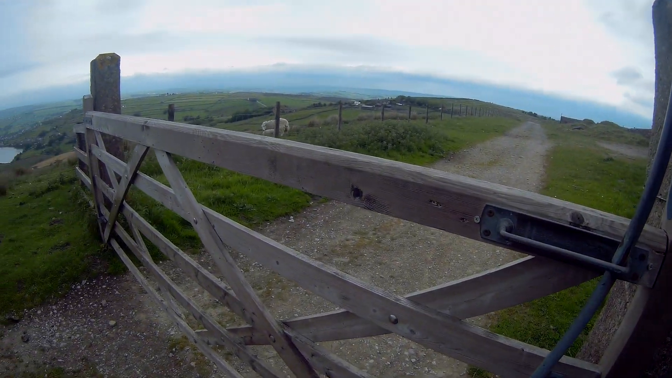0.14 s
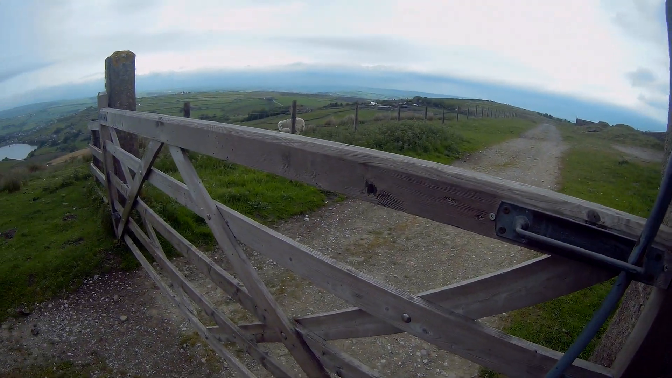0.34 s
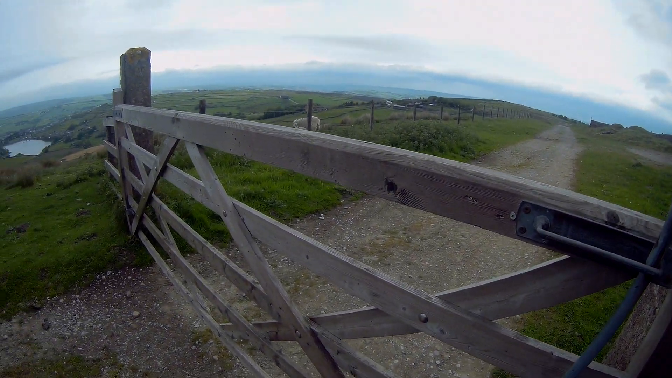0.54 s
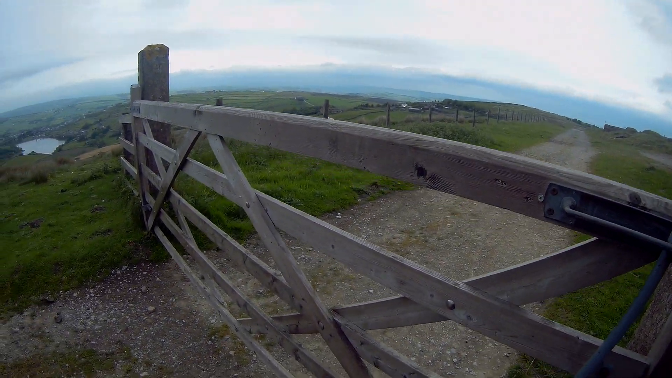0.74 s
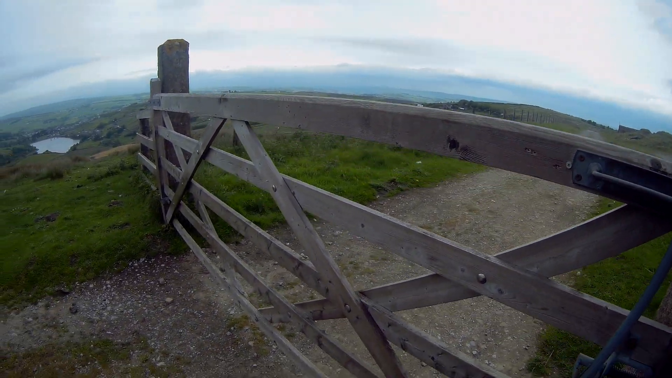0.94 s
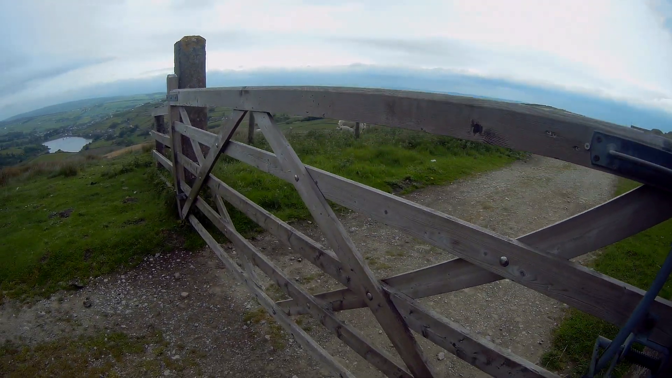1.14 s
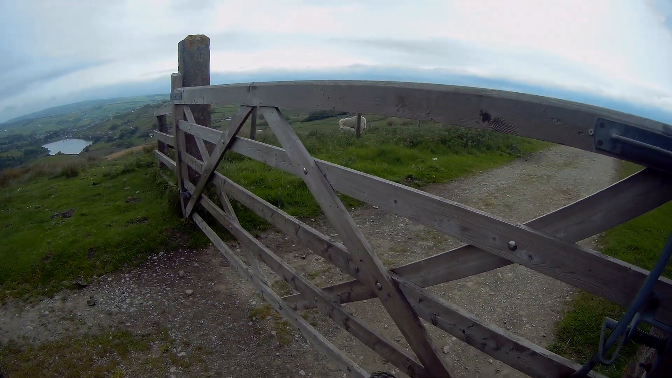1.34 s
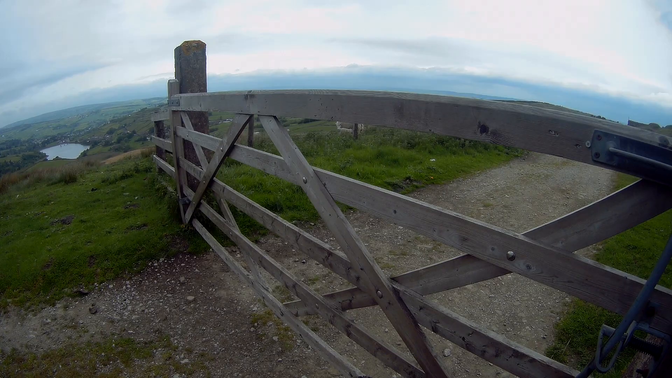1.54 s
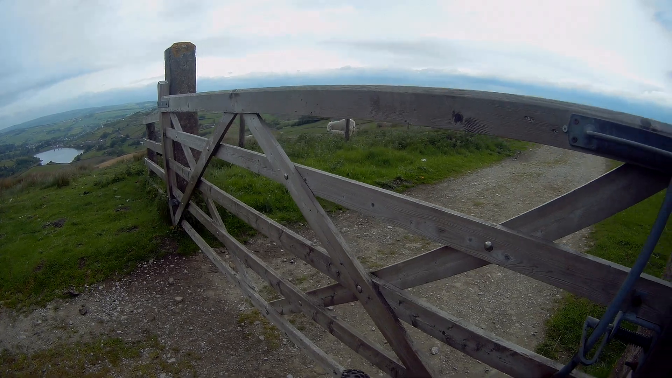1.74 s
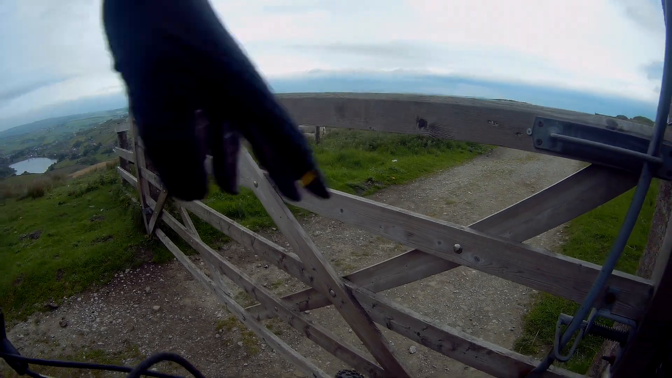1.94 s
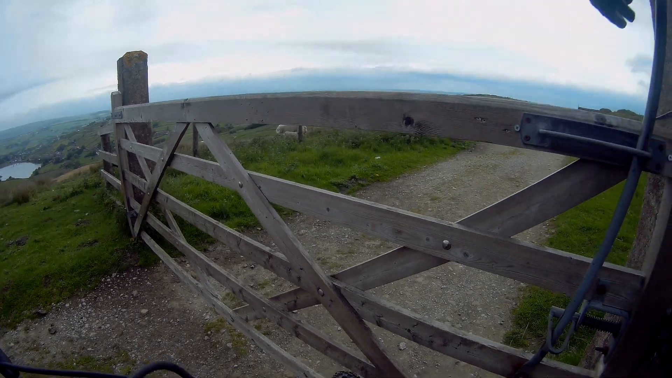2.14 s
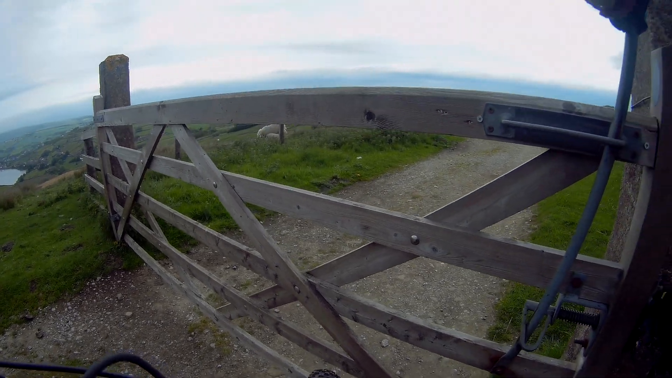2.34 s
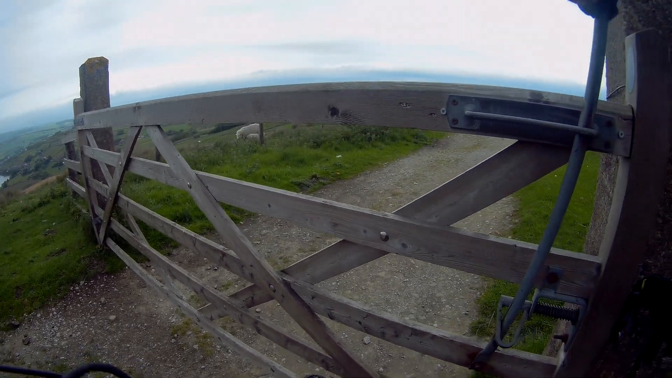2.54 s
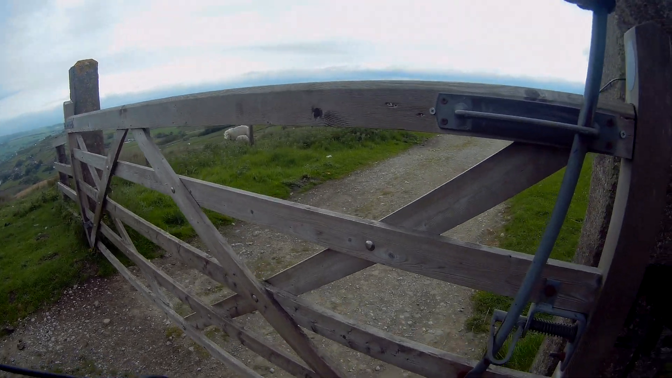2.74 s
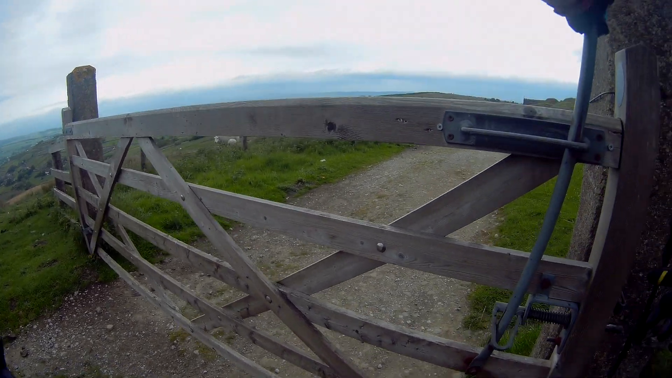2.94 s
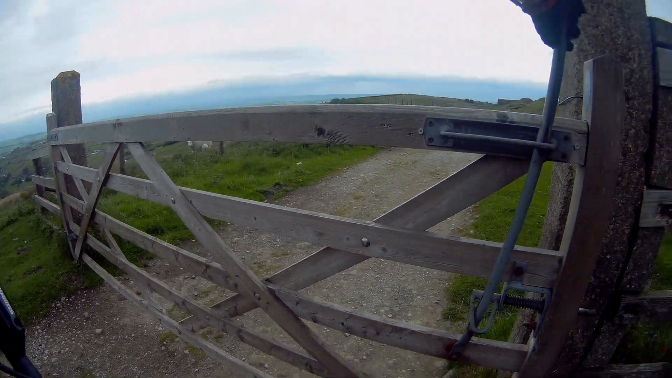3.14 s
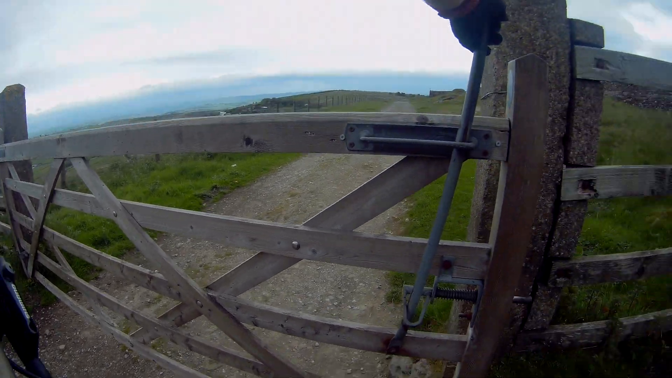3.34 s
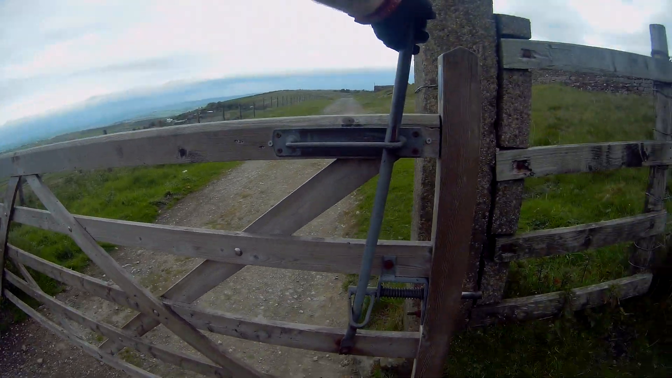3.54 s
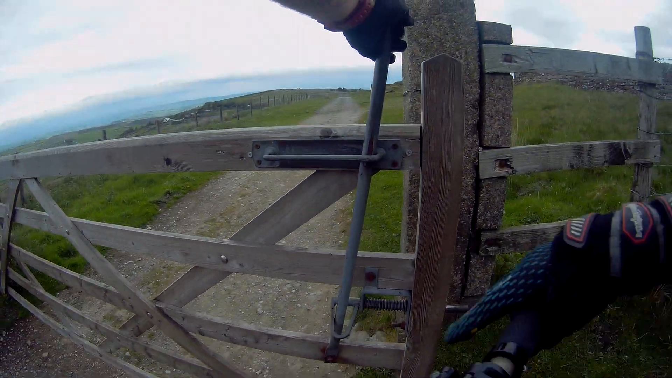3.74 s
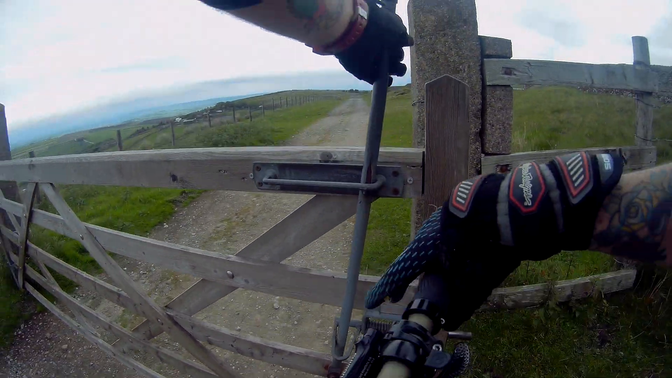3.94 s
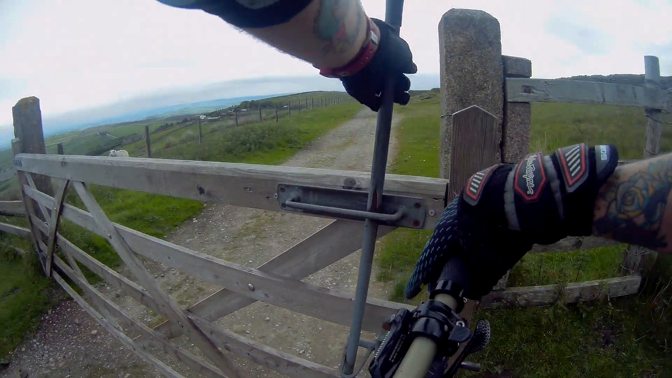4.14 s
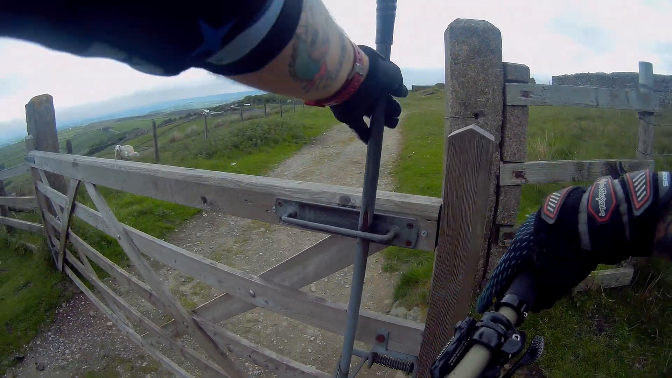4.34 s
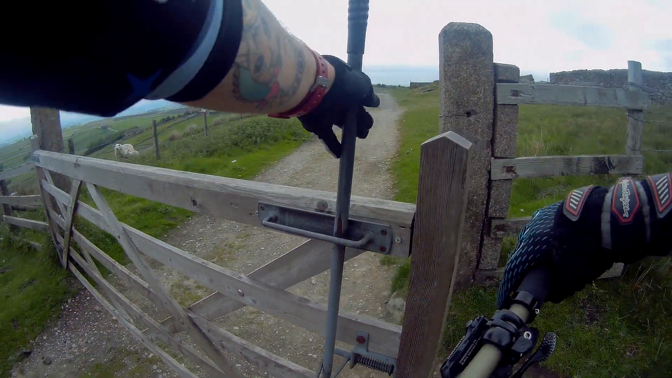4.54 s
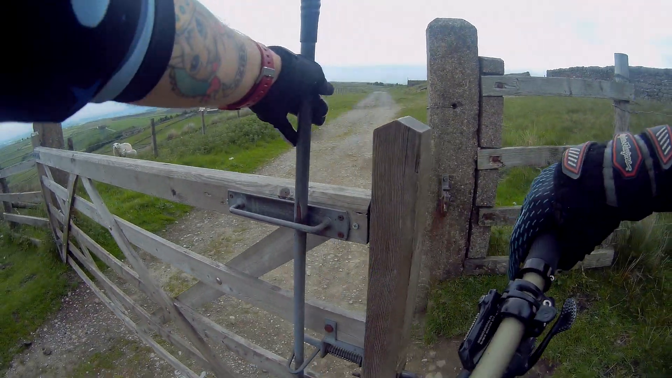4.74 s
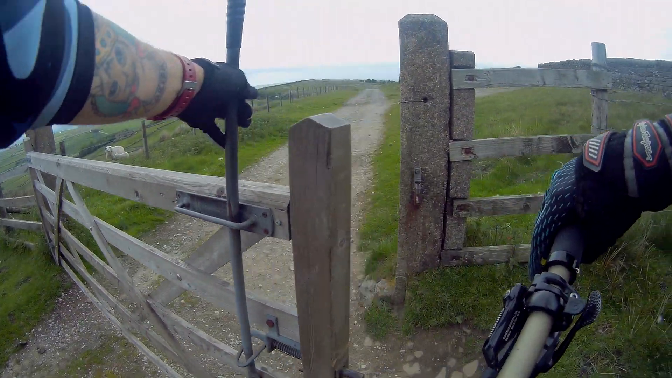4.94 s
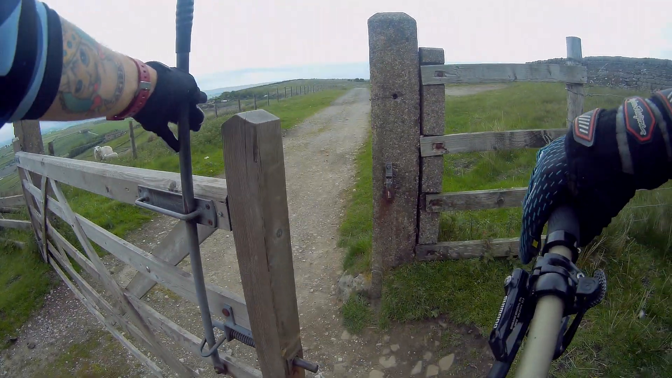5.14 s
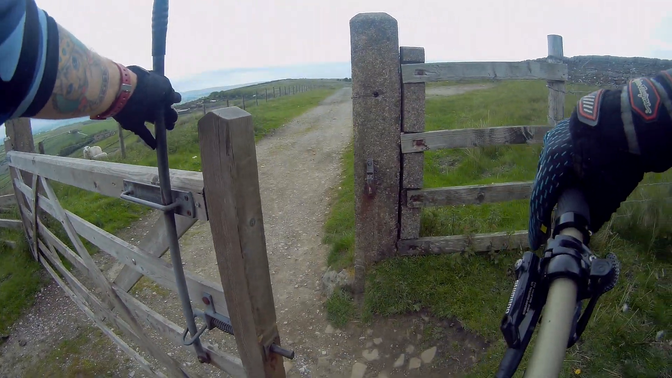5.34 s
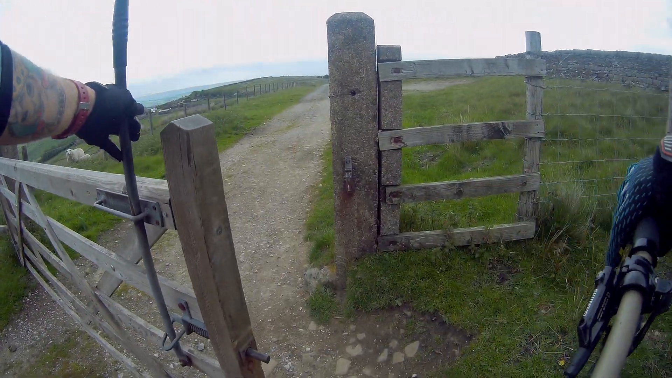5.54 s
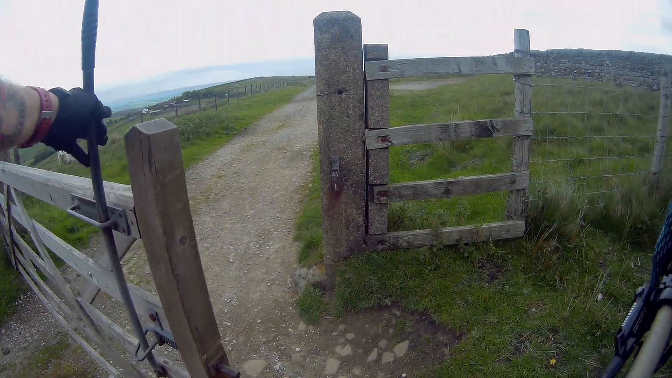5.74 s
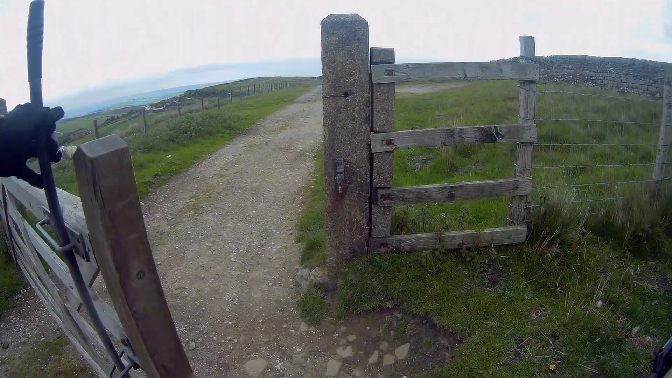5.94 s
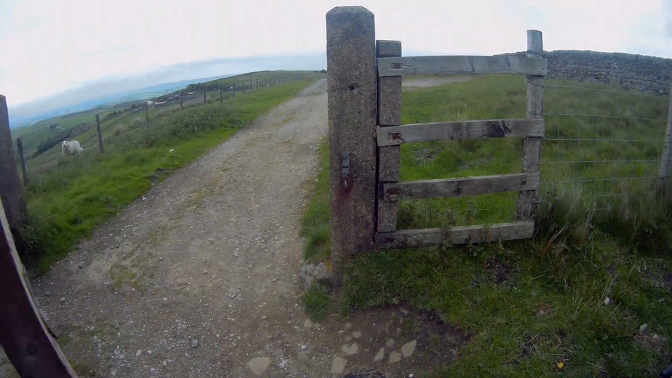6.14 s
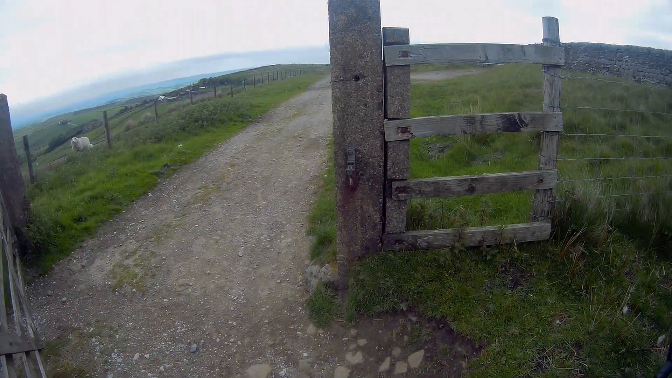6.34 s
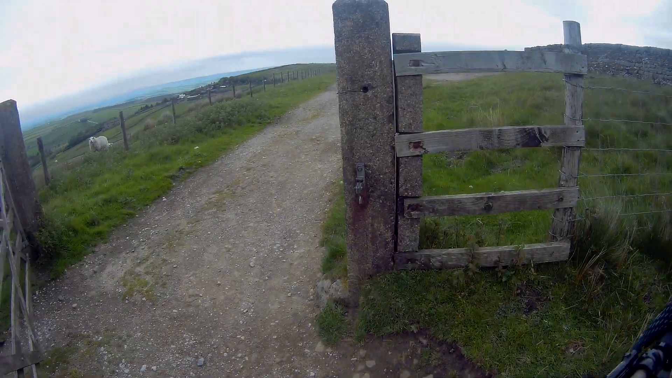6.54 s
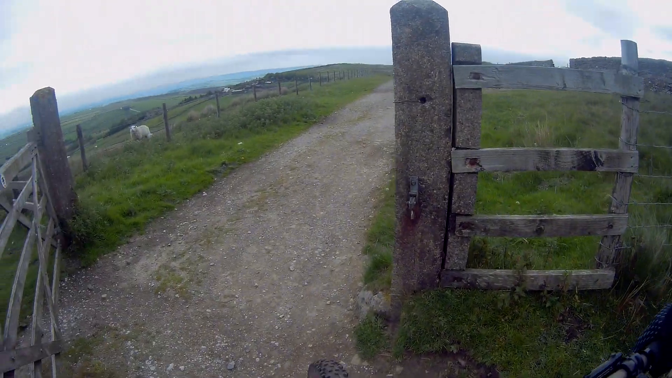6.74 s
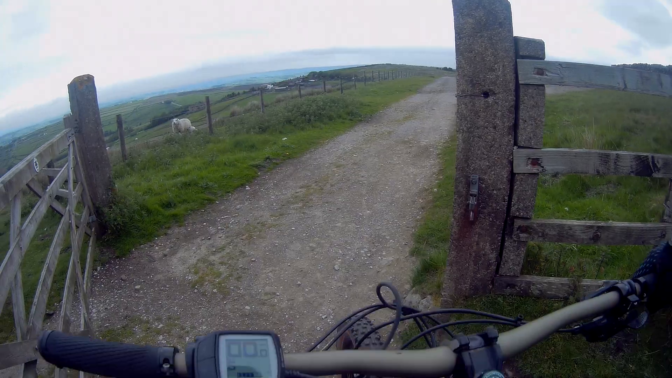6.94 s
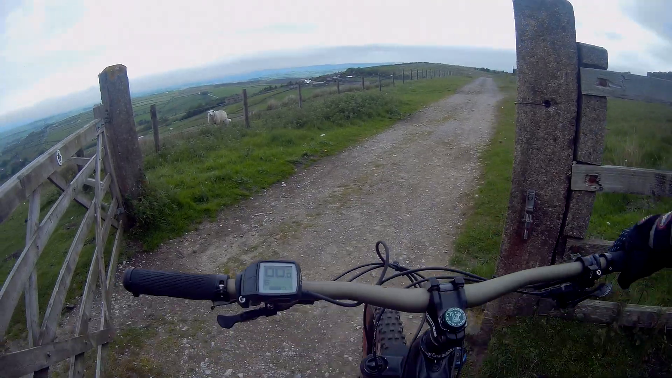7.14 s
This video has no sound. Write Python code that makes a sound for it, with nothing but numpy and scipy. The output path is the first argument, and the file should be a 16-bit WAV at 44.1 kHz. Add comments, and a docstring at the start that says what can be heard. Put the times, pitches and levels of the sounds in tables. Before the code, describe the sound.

Freewheel clicks and a brake squeak, then loud clanks and a bright metallic chink as a gate latch is worked in light wind.

```python
"""Cyclist at a moorland gate

A cyclist rolls up to a wooden field gate, works its steel spring latch by the long rod and pushes it open.
Pawls, knocks, thuds and clanks are short contacts or ringing modes; brakes, rod and hinge are gliding tones.
Shoes, tyres, sleeves and jacket are coloured, clumped noise; the loose bolt is a run of random taps.
Low noise bumps a chest-worn microphone with gusts and knocks; the tallest peaks overload it."""
import sys
import numpy as np
from scipy import signal
from scipy.fft import rfft, irfft, next_fast_len
from scipy.io import wavfile

SR = 44100
rng = np.random.default_rng(int(sys.argv[2]) if len(sys.argv) > 2 else 0)


def transcribe(u):
    """Save the signal u as a 16-bit wav file named by the first command-line argument.

    u: samples, shape (n,) or (channels, n), limited to [-1, 1]; the rate is SR.
    q: integer samples, one column per channel.
    """
    v = np.clip(np.atleast_2d(u).T, -1, 1)
    q = np.round(v * 32767).astype(np.int16)
    wavfile.write(sys.argv[1], SR, q)


N = 317079
TIME = np.arange(N) / SR
AFTER = TIME[:SR * 2 // 5]  # time since a blow [s]
STEPS = TIME[::32]  # coarse clock of the level envelopes [s]


def amp(db):
    """Decibels to gain."""
    return 10 ** (np.asarray(db) / 20)


def unit(x):
    """Scales to rms 1."""
    return x / np.sqrt(np.mean(x ** 2) + 1e-20)


def over_hz(points, hz):
    """Reads a table on a log-frequency axis."""
    f, value = np.transpose(points)
    return np.interp(np.log(hz + 1), np.log(f + 1), value)


def add(mix, s, sound):
    """Mixes a sound in at time s."""
    part = mix[max(round(s * SR), 0):][:len(sound)]
    part += sound[:len(part)]


def colour(x, points):
    """Gives x a spectrum, at rms 1."""
    gain = amp(over_hz(points, np.fft.rfftfreq(len(x), 1 / SR)))
    return unit(irfft(rfft(x) * gain, len(x)))


def wander(rate_hz, count=N):
    """Smooth chance of rms 1 that moves up to about the given rate."""
    size = next_fast_len(count)
    smoothing = np.exp(-(np.fft.rfftfreq(size, 1 / SR) / rate_hz) ** 2)
    return unit(irfft(rfft(rng.standard_normal(size)) * smoothing, size)[:count])


def together(envelopes_db):
    """Adds the powers of overlapping envelopes; gain at every sample."""
    return np.interp(TIME, STEPS, np.sqrt(sum(amp(db) ** 2 for db in envelopes_db)))


def swells(rows):
    """Each movement builds to a peak and dies away; rise and fall are the times for 20 dB."""
    return together(db - 20 * np.maximum((s - STEPS) / rise, (STEPS - s) / fall)
                    for s, rise, fall, db in rows)


def shaken(fall_db_per_s):
    """Every knock shakes the gate by the weight of its low band, and the shaking dies away."""
    return together(np.where(STEPS < s, -np.inf, low_db - fall_db_per_s * (STEPS - s))
                    for s, low_db, *_ in KNOCKS)


def friction(strength, spectrum, grains_per_s, spread_db, smooth_db, clump_hz, clump_db):
    """Tiny slips of unequal size come in clumps over a smooth hiss."""
    sizes = amp(spread_db * np.minimum(rng.exponential(1, N), 4)) * rng.standard_normal(N)
    slips = unit(sizes * (rng.random(N) < grains_per_s / SR))
    grains = slips + amp(smooth_db) * rng.standard_normal(N)
    return strength * colour(grains * amp(clump_db * wander(clump_hz)), spectrum)


def ring(modes, scatter=1, unlike_db=0, detune=0):
    """Dying sines; where the blow lands scatters their starting phases, strengths and pitches."""
    out = 0
    for hz, db, t60 in modes:
        fade = amp(db + unlike_db * rng.standard_normal() - 60 * AFTER / t60)
        turns = hz * (1 + detune * rng.standard_normal()) * AFTER + scatter * rng.random()
        out = out + fade * np.sin(2 * np.pi * turns)
    return out


def dense_ring(t60s):
    """Countless weak modes: noise whose bands die at their own speeds."""
    hz, t, z = signal.stft(rng.standard_normal(len(AFTER)), SR, nperseg=256)
    fade = amp(-60 * t / over_hz(t60s, hz)[:, None])
    return signal.istft(z * fade, SR, nperseg=256)[1][:len(AFTER)]


# edges of the low, middle, high and top bands of a blow: frequency [Hz]
BLOW_BANDS = [200, 1100, 2500, 6000, 16000]


def blows(rows, modes, t60s, modes_db, rise, body, low_pass_hz, detune=0):
    """A short chatter of contact, then the part rings on; each blow has its own balance of bands."""
    out, attack = np.zeros(N), round(.015 * SR)
    filters = [signal.butter(N=4, Wn=edges, btype="band", fs=SR, output="sos")
               for edges in zip(BLOW_BANDS, BLOW_BANDS[1:])]
    low_pass = signal.butter(N=4, Wn=min(low_pass_hz, 20000), fs=SR, output="sos")
    for s, *bands_db, contact, ring_db in rows:
        chatter = rng.standard_normal(len(AFTER)) * np.exp(-AFTER / max(contact, 2e-4))
        tones = ring(modes, unlike_db=5, detune=detune)
        after_ring = amp(ring_db) * (dense_ring(t60s) + amp(modes_db) * tones)
        sound = body((chatter + after_ring) * (1 - np.exp(-AFTER / rise)))
        sound = signal.sosfilt(low_pass, sound)
        for sos, db in zip(filters, bands_db):
            band = signal.sosfilt(sos, sound)
            add(out, s, amp(db) * band / np.std(band[:attack]))  # level is set over the first 15 ms
    return out


def squeak(rows, harmonics_db, jitter, flutter_db):
    """Stick-slip friction locks to one pitch; the unsteady grip shakes the upper harmonics most."""
    s, hz, db = np.transpose(rows)
    t = np.arange(s[0], s[-1], 1 / SR)
    turns = np.cumsum(np.interp(t, s, hz) * (1 + jitter * wander(250, len(t)))) / SR
    tone = np.zeros(len(t))
    for k, harmonic_db in enumerate(harmonics_db, 1):
        flutter = flutter_db * np.sqrt(k) * wander(120, len(t))
        tone += amp(harmonic_db + flutter) * np.sin(2 * np.pi * k * turns)
    out = np.zeros(N)
    add(out, s[0], unit(tone) * amp(np.interp(t, s, db)) * signal.windows.tukey(len(t), .05))
    return out


# gusts on the microphone: (middle time [s], half width [s], level [dB])
GUSTS = [(0.19, 0.093, -43), (0.6, 0.27, -43.5), (1.05, 0.18, -49.5), (1.382, 0.31, -57.5),
         (1.95, 0.092, -49), (1.78, .05, -52), (3.35, .06, -53), (4.66, 0.17, -53), (5.05, 0.1, -58.5),
         (5.9, 0.38, -57.5), (6.28, 0.15, -48), (6.8, 0.39, -48)]


def gusts(breeze_db=-68.5):
    """Rounded gusts, 10 dB down at their half width, over a light breeze."""
    blasts = together(db - 10 * ((STEPS - s) / width) ** 2 for s, width, db in GUSTS)
    return np.hypot(amp(breeze_db), blasts)


# rumble of wind and jolts: (frequency [Hz], level [dB])
WIND_COLOUR = [(8.8, -5.5), (15, -1.5), (49, -3.5), (130, -14.5), (145, -17.5), (189, -18.5), (300, -23.5),
               (390, -26), (660, -120)]


def wind_and_jolts(jolt_db=-20, jolt_fall_db_per_s=172):
    """Gusts press on the microphone, and each knock jolts it through the rider's arm: low noise."""
    bumps = np.hypot(gusts(), amp(jolt_db) * shaken(jolt_fall_db_per_s))
    return bumps * colour(rng.standard_normal(N), WIND_COLOUR)


# still air over the moor: (frequency [Hz], level [dB])
AIR_COLOUR = [(35, -18), (60, 3), (803, -3.5), (862, 3), (946, -1.5), (3040, -21), (12400, -39.5),
              (14200, -15.5), (16000, -27)]


def still_air():
    """A steady bed of coloured noise."""
    return amp(-67) * colour(rng.standard_normal(N), AIR_COLOUR)


def whine(hz=13715, rms_db=-69):
    """The microphone's electronics whine thinly on one steady pitch."""
    return amp(rms_db) * np.sqrt(2) * np.sin(2 * np.pi * hz * TIME)


# shoes and tyres scuff the track: (peak time [s], rise [s], fall [s], level [dB])
SCUFFS = [(0.19, 0.066, 0.086, -41), (0.65, 0.44, 0.27, -57.5), (1.68, 0.85, 0.37, -51.5),
          (3.0, 0.52, 0.54, -45), (3.75, 1, 0.34, -48.5), (4.29, .12, 0.084, -52.5),
          (5.33, 0.82, 0.5, -49.5), (5.75, 0.35, .4, -66), (6.28, 0.1, 0.47, -52),
          (6.92, 0.67, 0.78, -44.5)]
# scrape of track and rubbing joints: (frequency [Hz], level [dB])
SCRAPE_COLOUR = [(80, -19.5), (250, -7.5), (450, -2), (750, 1.5), (1200, -5.5), (2000, -5), (3000, -19.5),
                 (5000, -22.5), (9000, -25.5), (16000, -54)]


def scuffs(shudder_db=-21.5, shudder_fall_db_per_s=112.5):
    """Shoes and tyres scrape the track, and each knock leaves the gate's joints rubbing."""
    rubbing = np.hypot(swells(SCUFFS), amp(shudder_db) * shaken(shudder_fall_db_per_s))
    return friction(rubbing, SCRAPE_COLOUR, grains_per_s=900, spread_db=2.5,
                    smooth_db=0, clump_hz=45, clump_db=2.8)


# rustle of the jacket; at 3.06 s the shimmer of the freed bolt:
# (peak time [s], rise [s], fall [s], level before the lift [dB])
RUSTLES = [(0.12, 0.3, 1.7, -65.5), (1.5, 1, 3.3, -65.5), (1.93, .3, 0.21, -65), (2.46, 0.13, .12, -59),
           (2.75, .15, 0.61, -54), (3.06, 0.11, 0.14, -48.5), (3.65, 1.0, 0.74, -59.5),
           (4.32, .25, 0.29, -61.5), (5.25, 1.0, 0.55, -57), (5.8, .8, 1.14, -72.5)]
# rustle and shimmer: (frequency [Hz], level [dB])
RUSTLE_COLOUR = [(1000, -17.5), (2500, -6.5), (4500, -9.5), (7500, -5), (9800, -6.5), (11500, -10.5),
                 (13500, -19.5), (16000, -9.5)]


def rustle_and_shimmer():
    """Jacket folds slide in dense, mostly smooth friction; one swell of it is the freed bolt's shimmer."""
    lift = amp(4.5)
    return lift * friction(swells(RUSTLES), RUSTLE_COLOUR, grains_per_s=4000, spread_db=2.5,
                           smooth_db=8, clump_hz=50, clump_db=1.5)


# tyres coming to a halt and setting off again: (peak time [s], rise [s], fall [s], level [dB])
ROLL = [(0.11, 0.085, 0.22, -46.5), (6.93, 0.37, 0.3, -46)]
# loose gravel: (frequency [Hz], level [dB])
GRAVEL_COLOUR = [(100, -35), (250, -15), (450, 9), (900, -3), (2000, -13), (3000, -19), (4500, -5.5),
                 (7000, -11), (16000, -34)]


def gravel():
    """Tyres crunch over loose stones: sparse, strongly clumped grains."""
    return friction(swells(ROLL), GRAVEL_COLOUR, grains_per_s=350, spread_db=3,
                    smooth_db=-8, clump_hz=35, clump_db=4)


# pawls of the freewheel and gears: (time [s], low [dB], middle [dB], high [dB], top [dB],
# contact time [s], after-ring [dB])
CLICKS = [(0.047, -55, -47, -63, -57.5, 0.0027, -16), (0.095, -42.5, -42.5, -73, -38, 0.0013, 8),
          (0.123, -46, -40.5, -49.5, -32.5, 0.0012, -9), (0.16, -55, -50, -50, -49, 0.00074, -8),
          (0.191, -36, -30.5, -36, -31, 0.0087, -30), (0.327, -73, -69, -72, -63, 0.001, -3),
          (0.452, -51.5, -48, -45, -41.5, 0.00087, 10), (0.551, -52.5, -44, -41, -37.5, 0.00067, 7),
          (0.777, -55, -54.5, -57, -66, 0.0013, -27), (0.863, -49, -51, -59, -47.5, 0.0028, -11),
          (0.979, -59, -49.5, -53, -57.5, 0.0015, -8), (1.038, -60, -48.5, -51.5, -48.5, 0.0034, -23)]
# modes of the hub: (frequency [Hz], level [dB], t60 [s])
HUB = [(930, -12, .05), (1895, -8, .08), (2245, -1, .08), (2760, -1, .08), (3140, 3, .09), (4100, -5, .07),
       (5280, -5, .06), (6412, -12, .25), (6500, -5, .06), (7500, -1, .075), (7700, -5, .06),
       (8010, -6, .07), (8460, -3, .075), (9025, -8, .07), (9420, -7, .065), (10200, -9, .075),
       (11100, -6, .06), (12550, -7, .06), (14450, -21, .16)]
# decay of the hub's dense ring: (frequency [Hz], t60 [s])
CLICK_T60 = [(200, .1), (2000, .09), (8000, .07), (15000, .06)]


def freewheel(bounce_s=.0095, bounce_db=-9):
    """Single pawls drop, bounce once and ring the hub, each a little differently."""
    drops = blows(CLICKS, HUB, CLICK_T60, modes_db=-4, rise=.0012, body=unit,
                  low_pass_hz=13200, detune=.02)  # a higher low-pass than the knocks
    out = drops.copy()
    add(out, bounce_s, amp(bounce_db) * drops)
    return out


# the rod is hauled: (start [s], hold [s], level before the trim [dB])
RATTLES = [(1.108, 0.14, -46.5), (2.412, 0.018, -28.5), (2.592, 0.017, -22.5), (2.669, 0.014, -32.5),
           (2.699, .06, -32), (2.814, 0.16, -44.5), (3.549, .04, -34), (3.82, 0.083, -47.5),
           (4.206, 0.053, -44.5), (4.381, 0.029, -53.5), (4.668, 0.014, -52), (5.189, 0.069, -46),
           (5.354, 0.037, -46), (5.598, 0.28, -51.5)]


def hauls(attack_db_per_s=1401.5, release_db_per_s=384.5):
    """The rattle starts quickly, holds while the rod moves and then settles."""
    return together(db - np.maximum(attack_db_per_s * (s - STEPS), 0)
                    - np.maximum(release_db_per_s * (STEPS - s - hold), 0)
                    for s, hold, db in RATTLES)


# places where the loose bolt taps: contact time [s]
SPOTS = [.0008, .0013, .002, .003]
# modes of the bracket, also rung by the knocks: (frequency [Hz], level [dB], t60 [s])
BRACKET = [(381.5, -10.5, 0.19), (513.7, -10.5, 0.17), (582, -3, 0.052), (695, -12.5, 0.084),
           (847, -17.5, 0.31), (1056, -10.5, 0.091), (1220, -16, 0.1), (1450, -14, 0.22),
           (1568, -14.5, 0.019), (1824, -0.5, 0.029), (1930, -8.5, 0.021), (2200, 3, 0.056),
           (3396, 1, 0.061), (4240, -44, .07), (4700, -15, 0.089), (6950, -5, 0.084)]
# loose bolt: (frequency [Hz], level [dB])
RATTLE_COLOUR = [(100, -26.5), (250, -2), (450, -6), (750, 1.5), (1200, -4.5), (1900, -3), (2500, -13),
                 (3300, -24), (5000, -27.5), (7700, -18.5), (10500, -31), (16000, -36)]


def loose_bolt(taps_per_s=130, spread_db=3, ring_db=-40):
    """The bolt rattles in its guide: quick taps of unequal size, each briefly ringing the bracket."""
    sizes = amp(spread_db * rng.standard_normal(N)) * rng.choice([-1, 1], N)
    taps = sizes * (rng.random(N) < taps_per_s / SR)
    spot, out = rng.integers(0, len(SPOTS), N), np.zeros(N)
    for k, contact_s in enumerate(SPOTS):  # each spot on the guide answers with a colour of its own
        contact = rng.standard_normal(len(AFTER)) * AFTER / contact_s * np.exp(-AFTER / contact_s)
        answer = contact + amp(ring_db) * ring(BRACKET, unlike_db=2, detune=.06)
        out += signal.oaconvolve(taps * (spot == k), unit(answer))[:N]
    trim = amp(-1)
    return trim * hauls() * colour(out, RATTLE_COLOUR)


# broad resonances of the latch plate on the gate: (frequency [Hz], width [Hz], level [dB])
PLATE = [(544, 140, 9.5), (783, 440, 19.5), (1698, 513, 22), (3920, 780, 18.5), (8140, 4200, 19)]


def plate(x):
    """The latch plate lifts a few broad bands."""
    return x + sum(amp(db) * signal.lfilter(*signal.iirpeak(hz, hz / width, SR), x)
                   for hz, width, db in PLATE)


# blows of rod and bolt on the gate: (time [s], low [dB], middle [dB], high [dB], top [dB],
# contact time [s], after-ring [dB]); band levels are before the trim
KNOCKS = [(1.19, -38.5, -43, -47.5, -38, 0.00077, 14), (1.22, -43.5, -34, -55, -59, 0.0022, -11),
          (1.687, -33, -43, -77, -56, 0.0024, -24.5), (1.763, -39.5, -43, -53.5, -49, 0.00057, -19.5),
          (1.912, -47.5, -48, -69, -79, 0.00073, 2), (2.297, -46, -34, -52.5, -52, 0.0008, 2),
          (2.318, -40, -46, -65, -76, 0.0012, -6), (2.345, -47, -43, -65, -65, 0.00039, -5),
          (2.375, -37.5, -40, -61, -69, 0.00077, -8), (2.394, -27, -30, -47, -47, 0.0012, -13),
          (2.409, -36, -28.5, -45.5, -48, 0.0015, 0), (2.455, -30, -34.5, -44, -53, 0.0018, -2),
          (2.538, -38, -33.5, -42, -55, 0.00053, -26), (2.557, -44, -41, -54, -69, 0.001, -5),
          (2.578, -40, -43, -52, -65, 0.0012, -8), (2.608, -20, -24.5, -46, -50, 0.0009, -27),
          (2.631, -35, -35.5, -46, -46, 0.0011, -6), (2.695, -38.5, -29.5, -38, -43.5, 0.0012, -6),
          (2.726, -33, -35, -43, -46, 0.0008, -4), (2.747, -38.5, -25, -38, -53, 0.00086, 3),
          (2.761, -43, -35, -37.5, -33, 0.0069, -38), (2.856, -28, -22.5, -23.5, -24.5, 0.0019, -16.5),
          (2.876, -38, -33, -57, -52, 0.0014, -20), (2.9943, -30, -30, -30, -23.5, 0.0014, -14),
          (3.302, -53, -52, -69, -68, 0.0013, -36), (3.401, -43, -46.5, -46.5, -40.5, 0.0028, -23),
          (3.45, -59, -46.5, -55.5, -47.5, 0.00088, -13), (3.529, -33, -34.5, -36, -42.5, 0.001, -3),
          (3.595, -41, -30.5, -51, -60, 0.0023, -15), (3.853, -43.5, -47.5, -56, -58.5, 0.0011, -8.5),
          (4.135, -53.5, -52.5, -71.5, -66, 0.0012, -11), (4.2661, -34, -31.5, -40, -31.5, 0.0011, -14),
          (4.559, -47, -53.5, -61, -66.5, 0.0019, -5), (4.802, -57, -53.5, -62, -63.5, 0.001, -23),
          (4.9456, -35, -36, -38.5, -41, 0.0022, -13.5), (5.2527, -29.5, -29, -24.5, -36.5, 0.0012, -5.5),
          (5.335, -40, -65, -75, -49.5, 0.0014, -14), (5.4216, -35, -30.5, -33, -44, 0.0018, -13),
          (5.614, -41, -49, -62, -58, 0.00099, -4), (5.675, -39.5, -41.5, -50.5, -44.5, 0.00053, 6),
          (5.685, -47, -40.5, -47, -44, 0.0021, -16), (5.747, -42.5, -72, -82, -79, 0.001, -18),
          (5.791, -47, -41.5, -50, -54, 0.00088, 0), (5.837, -37, -40, -37.5, -49.5, 0.0027, -10.5),
          (5.919, -46, -48, -66, -81, 0.0014, -6), (5.942, -60.5, -71.5, -63.5, -55, 0.0014, -17.5),
          (6.0999, -37, -55.5, -59.5, -74.5, 0.0016, -19), (6.154, -50.5, -52, -61, -57, 0.00041, -27.5),
          (6.467, -39, -38, -44, -50, 0.0013, -5), (6.632, -55, -47, -54, -43, 0.00061, -2)]
# decay of the gate's dense ring: (frequency [Hz], t60 [s])
KNOCK_T60 = [(200, 0.37), (700, 0.14), (2000, 0.081), (5000, 0.062), (15000, 0.023)]


def knocks():
    """Rod and bolt strike the gate and ring the bracket."""
    trim = amp(-0.45)
    return trim * blows(KNOCKS, BRACKET, KNOCK_T60, modes_db=-18.0, rise=0.00077, body=plate,
                        low_pass_hz=10900)


# squeak of the front brake: (time [s], pitch [Hz], level [dB])
FRONT_BRAKE = [(1.442, 863, -64), (1.454, 925, -29), (1.467, 868, -26), (1.486, 895, -25), (1.5, 934, -34),
               (1.52, 874, -52), (1.54, 905, -67)]


def front_brake():
    """The brake grips and slips in a short squeak rich in harmonics."""
    return squeak(FRONT_BRAKE, [0, -3, -21, -36, -31, -38, -38, -32, -33], jitter=.01, flutter_db=1.8)


# ring of the brake disc: (time [s], pitch [Hz], level [dB])
DISC_RING = [(1.5, 895, -47), (1.62, 892, -58), (1.85, 888, -58), (2.14, 888, -68)]


def disc_ring():
    """The disc rings on after the squeak, nearly a pure tone."""
    return squeak(DISC_RING, [0, -20], jitter=0.012, flutter_db=2.0)


# sleeves as the arm reaches out and swings the gate, and as the rider gets back on the bicycle:
# (peak time [s], rise [s], fall [s], level [dB])
SWISHES = [(1.77, 0.026, 0.079, -42.5), (5.16, .1, 0.085, -53), (5.225, 0.025, 0.042, -40),
           (5.345, .03, 0.12, -48.5), (6.21, 0.019, 0.031, -49), (6.3, 0.05, 0.023, -46.5),
           (6.43, 0.028, 0.11, -46), (6.615, 0.043, 0.023, -38.5), (7.05, 0.81, 0.83, -42)]
# sleeve cloth: (frequency [Hz], level [dB])
SWISH_COLOUR = [(1000, -6.5), (2200, -7.5), (3100, -8), (4200, -2), (5300, -9.5), (6400, 3), (7500, 8.5),
                (8400, -1.5), (9600, 7.5), (11500, -2.5), (13000, 2), (16000, -3.5)]


def sleeves():
    """Quick strokes of cloth on cloth: very dense grains under a smooth hiss."""
    return friction(swells(SWISHES), SWISH_COLOUR, grains_per_s=8000, spread_db=2,
                    smooth_db=8, clump_hz=40, clump_db=2.4)


# the rod hits its stop and the timber answers: (time [s], level [dB])
THUDS = [(2.394, 1), (2.6082, 4.5)]
# modes of the timber rail: (frequency [Hz], level [dB], t60 [s])
TIMBER = [(432, -9, 0.026), (774, 0, 0.019), (886, 0.5, 0.011), (1213, -7, 0.024), (3150, -4.5, 0.0049)]


def thuds():
    """A blunt blow sets the heavy rail swinging in a few strongly damped modes."""
    out = np.zeros(N)
    for s, db in THUDS:
        add(out, s, amp(db) * ring(TIMBER, scatter=0) * (1 - np.exp(-AFTER / 0.0014)))
    return out


# the bolt springs free and rings: (time [s], level [dB])
CHINKS = [(2.668, -33), (2.826, -23.5), (2.9893, -1.5), (3.018, -8), (3.071, -26)]
# modes of the bolt: (frequency [Hz], level [dB], t60 [s])
BOLT = [(2320, -30, 0.24), (3128, -21, 0.09), (4218, -45, 0.7), (4425, -44, 0.33), (4980, -35, 0.1),
        (5270, -29, 0.09), (5776, -27, 0.24), (6400, -36, 0.32), (6845, -24, 0.07), (7346, -26, 0.16),
        (7562, -21, 0.14), (8430, -40, 0.18), (9112, -23, 0.08), (9383, -26, 0.21), (10130, -30, 0.1),
        (10985, -22, 0.17), (11510, -38, 0.18), (11812, -30, 0.17), (12402, -40, 0.33), (12805, -33, 0.33),
        (13900, -26, 0.06), (14320, -41, 0.21), (15300, -28, 0.07)]
# decay of the bolt's shimmer: (frequency [Hz], t60 [s])
BOLT_T60 = [(200, 0.088), (2000, 0.24), (7000, 0.19), (15000, 0.19)]


def chinks(shimmer_db=-21.5, clash_db=-16.0, clash_s=0.009):
    """The freed bolt clashes briefly, then rings with clear modes over a dense shimmer."""
    out = np.zeros(N)
    bright = signal.butter(N=2, Wn=[4500, 13000], btype="band", fs=SR, output="sos")
    for s, db in CHINKS:
        clash = amp(clash_db) * rng.standard_normal(len(AFTER)) * np.exp(-AFTER / clash_s)
        shimmer = amp(shimmer_db) * dense_ring(BOLT_T60)
        add(out, s, amp(db) * (ring(BOLT) + signal.sosfilt(bright, clash + shimmer)))
    return out


# the bolt slams against the end of its guide: (time [s], level [dB])
SLAMS = [(2.8565, -7), (2.9945, -8.5), (3.5302, -12.5)]
# modes of the guide: (frequency [Hz], level [dB], t60 [s])
GUIDE = [(1787, 0.5, 0.028), (1950, -6.5, .022), (2290, -8.5, 0.021)]


def slams():
    """The steel guide answers the bolt with a short, focused clank."""
    out = np.zeros(N)
    for s, db in SLAMS:
        add(out, s, amp(db) * ring(GUIDE) * (1 - np.exp(-AFTER / 0.0003)))
    return out


# groan of the rod in its guide: (time [s], pitch [Hz], level [dB])
ROD_GROAN = [(4.14, 394, -57), (4.2, 388, -48.5), (4.23, 384.3, -35.5), (4.265, 387.4, -47),
             (4.35, 402, -54)]


def rod_groan():
    """The rod sticks and slips in its guide: a low, uneven groan."""
    return squeak(ROD_GROAN, [0, -8, -16, -11, -18], jitter=.035, flutter_db=2.5)


# one list for each squeak of the hinge: (time [s], pitch [Hz], level [dB])
HINGE_SQUEAKS = [
    [(4.865, 2810, -62), (4.89, 4600, -58), (4.915, 6700, -51), (4.935, 6950, -52), (4.946, 6700, -53)],
    [(5.085, 4700, -41), (5.12, 6900, -63), (5.145, 7800, -75), (5.16, 9500, -44), (5.19, 11400, -56)],
]


def hinge():
    """The dry hinge chirps upwards on a shaky single tone."""
    return sum(squeak(rows, [0], jitter=.05, flutter_db=5) for rows in HINGE_SQUEAKS)


# squeak of the rear brake: (time [s], pitch [Hz], level [dB])
REAR_BRAKE = [(6.32, 2570, -45), (6.338, 2600, -51.5), (6.372, 2610, -57), (6.412, 2560, -42),
              (6.474, 2568, -51), (6.558, 2590, -50), (6.58, 2680, -84)]


def rear_brake():
    """The brake squeaks high and thin, with hardly any overtone."""
    return squeak(REAR_BRAKE, [0, -36], jitter=0.0032, flutter_db=2.3)


def surroundings(x, ground_s, ground_db, tail_db):
    """One bounce off the track and a thin scatter from wall and fence."""
    scatter_t60 = [(200, 0.65), (1500, 0.16), (6000, 0.14), (15000, 0.091)]  # (frequency [Hz], t60 [s])
    echo = dense_ring(scatter_t60) * (1 - np.exp(-AFTER / .015))
    echo *= amp(tail_db) / np.linalg.norm(echo)
    echo[round(ground_s * SR)] += amp(ground_db)
    return x + signal.fftconvolve(x, echo)[:N]


def scene():
    """Gate, bicycle and rider in the open air; the frictions and the moor get no echo."""
    moor = wind_and_jolts() + still_air() + whine()
    frictions = scuffs() + rustle_and_shimmer() + gravel() + sleeves()
    gate = loose_bolt() + knocks() + thuds() + chinks() + slams() + rod_groan() + hinge()
    bicycle = freewheel() + front_brake() + disc_ring() + rear_brake()
    metal = surroundings(gate + bicycle, ground_s=0.0086, ground_db=-21.0, tail_db=-25.0)
    return (moor + frictions + metal)[None]


def record(dry):
    """The microphone flattens the tallest peaks; then a low-pass at 16.2 kHz limits the band."""
    ceiling = .6
    flattened = dry / (1 + (dry / ceiling) ** 6) ** (1 / 6)
    low_pass = signal.firwin(511, 16200, window=("kaiser", 9), fs=SR)
    return signal.oaconvolve(flattened, low_pass[None], "same")


dry = scene()
out = record(dry)
transcribe(out)
```